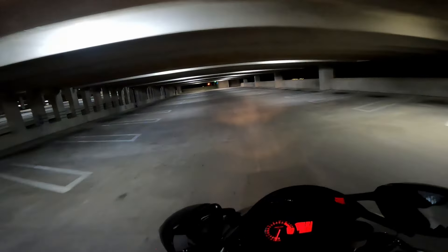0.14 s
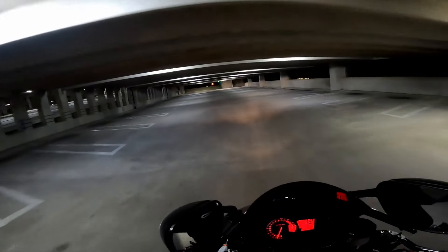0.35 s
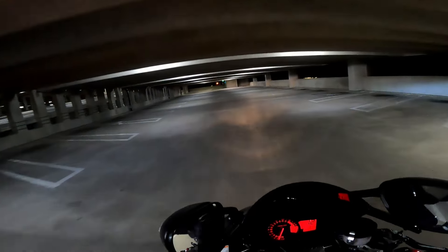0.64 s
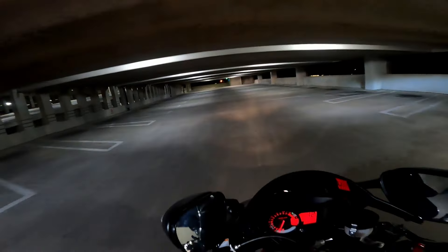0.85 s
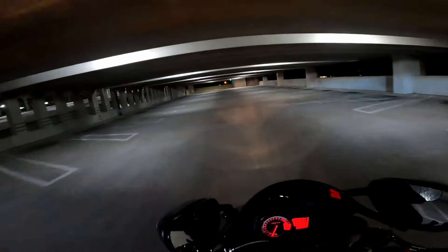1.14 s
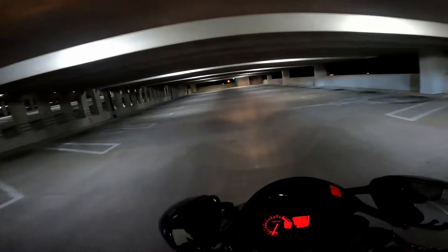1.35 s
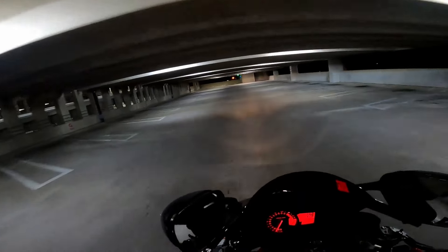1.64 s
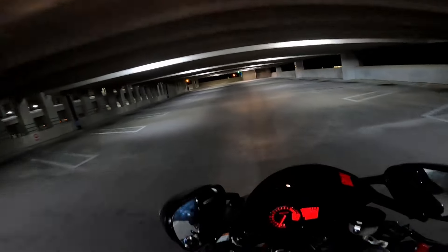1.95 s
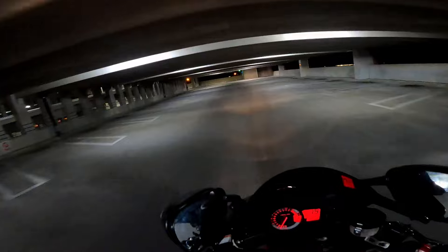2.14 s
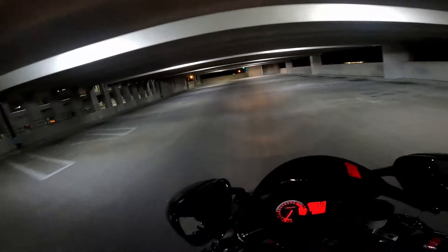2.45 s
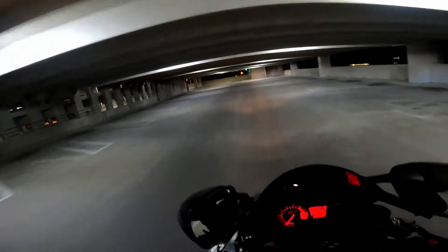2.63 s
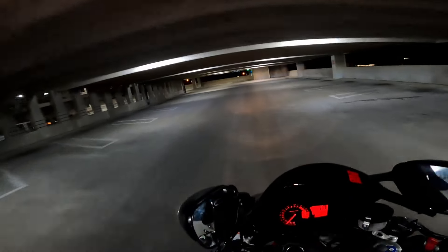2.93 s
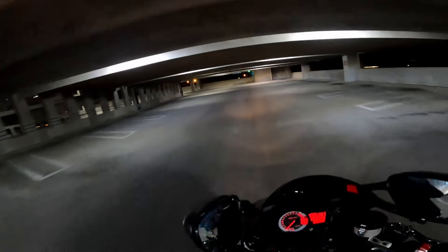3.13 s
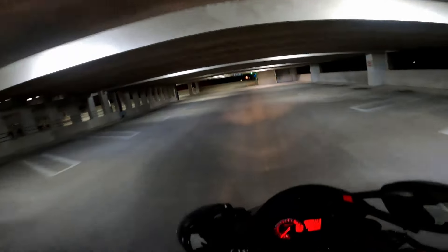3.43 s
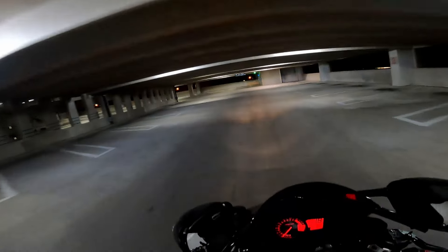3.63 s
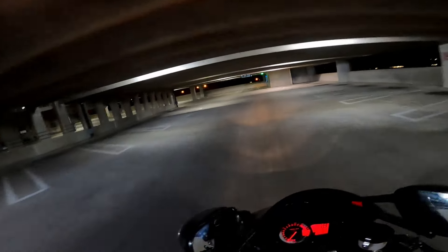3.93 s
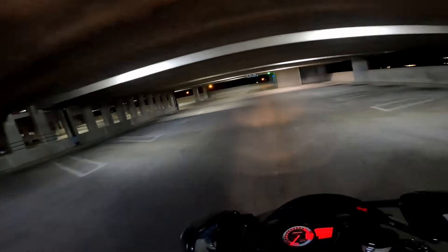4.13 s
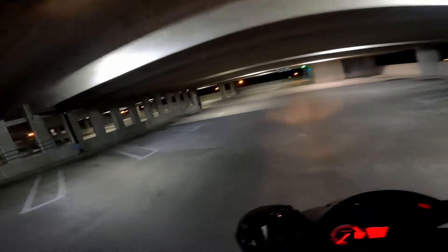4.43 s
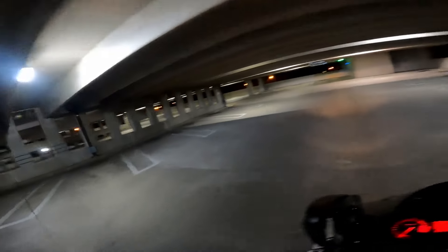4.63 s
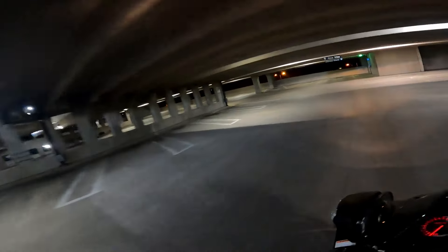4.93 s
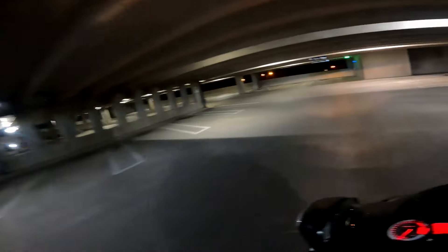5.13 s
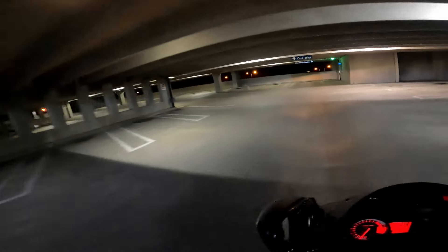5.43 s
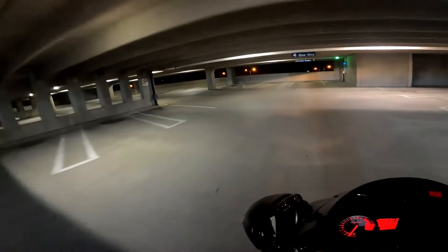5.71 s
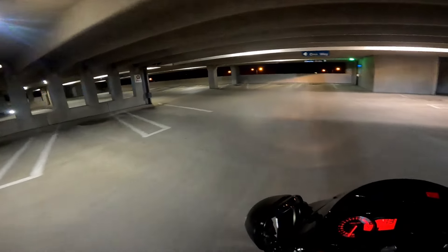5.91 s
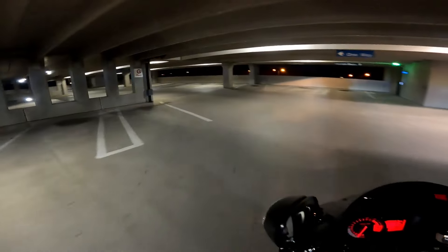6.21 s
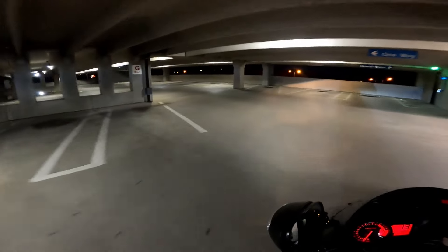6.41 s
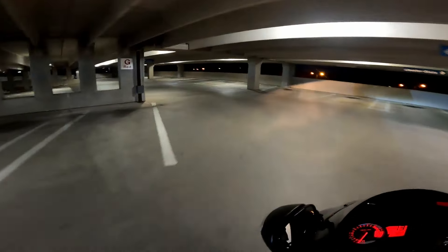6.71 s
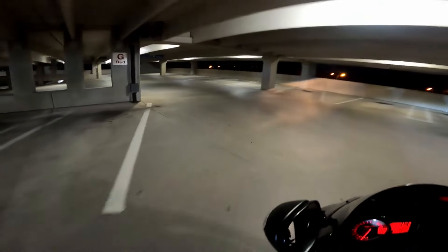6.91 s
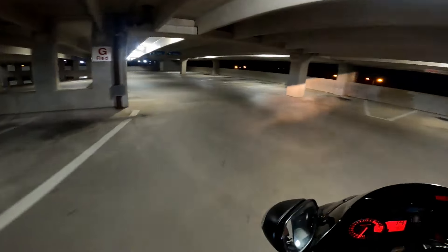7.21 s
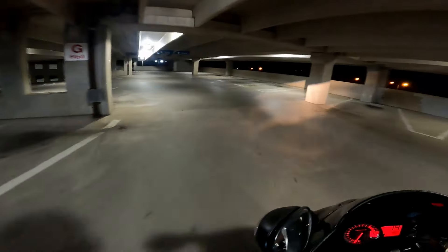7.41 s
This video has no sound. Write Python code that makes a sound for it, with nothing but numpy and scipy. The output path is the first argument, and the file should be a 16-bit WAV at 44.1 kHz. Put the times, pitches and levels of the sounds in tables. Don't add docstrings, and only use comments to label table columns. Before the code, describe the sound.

A four-cylinder motorcycle hums upward through a low concrete garage, peaks, coasts down with ticking valve gear, then rumbles unevenly as it pulls again.

```python
import sys
import numpy as np
from scipy import signal
from scipy.fft import rfft, irfft, next_fast_len
from scipy.io import wavfile
from scipy.ndimage import uniform_filter1d

SR = 44100
rng = np.random.default_rng(int(sys.argv[2]) if len(sys.argv) > 2 else 0)


def decibels_to_gain(level_db):
    exponent = np.asarray(level_db, float) / 20
    return 10 ** exponent


def put_to_file(sound):
    columns = np.atleast_2d(sound).T
    safe = np.clip(columns, -1, 1)
    whole_steps = np.round(safe * 32767)
    wavfile.write(sys.argv[1], SR, whole_steps.astype(np.int16))


N = 333396
T = np.arange(N) / SR

# time_s, throttle (0-1), uneven_burning (0-1)
THROTTLE = [(0, 0.8, 0), (1.2, 0.71, 0.18), (1.7, 0.76, 0), (2.05, 0.87, 0), (2.4, 0.93, .05),
            (2.8, 1., 0.1), (3.2, 0.91, 0.1), (3.32, 0.4, 0.51), (3.9, 0, 0.52), (4.5, 0.11, 0.64),
            (5.3, 0.35, 0.99), (5.9, 0.42, 1.), (6.2, .64, 0.8), (6.8, 0.67, 0.45), (7.15, 0.69, 0.3),
            (7.56, 0.4, 0.4)]


def evened(x):
    return x / np.sqrt(np.mean(x ** 2) + 1e-20)


def column(table, k):
    rows = np.array(table, float)
    return np.interp(T, rows[:, 0], rows[:, k])


def throttle_shut():
    return 1 - column(THROTTLE, 1)


def unevenness():
    return column(THROTTLE, 2)


def read(points, hz):
    f, value = np.transpose(points)
    return np.interp(np.log(hz + 1), np.log(f + 1), value)


def colour(x, points):
    length = x.shape[-1]
    size = next_fast_len(length)
    gain = decibels_to_gain(read(points, np.fft.rfftfreq(size, 1 / SR)))
    return irfft(rfft(x, size) * gain, size)[..., :length]


def ring(x, hz, width_hz):
    b, a = signal.iirpeak(hz, hz / width_hz, SR)
    return signal.lfilter(b, a, signal.lfilter(b, a, x))


def drift(rate_hz):
    knots = rng.standard_normal(400)
    return np.interp(T * rate_hz, np.arange(len(knots)), knots)


def swells(rows):
    return sum(db * np.cos(np.pi * np.clip((T - s) / length, -.5, .5)) ** 2 for s, db, length in rows)


def firings(turns, sizes):
    at = np.flatnonzero(np.diff(np.floor(turns)) > 0)
    train = np.zeros(N)
    train[at] = sizes[:len(at)]
    return train


def deck(x):
    # pitch_hz, t60_s
    decay = [(60, 1), (250, 0.9), (1000, 0.99), (4000, 1), (12000, 0.39)]
    # pitch_hz, echo_db
    echo_level = [(60, -28.5), (130, -27), (300, -16.5), (700, -11.5), (1500, -7), (4000, -5), (8000, -2),
                  (12000, -0.5)]
    taps = np.zeros((4, SR))
    at = np.arange(300, SR - 20, 20) + rng.integers(0, 20, (4, (SR - 301) // 20))
    np.put_along_axis(taps, at, rng.choice([-1., 1.], at.shape), 1)

    hz, t, z = signal.stft(taps, SR, nperseg=1024)
    z = z * decibels_to_gain(-60 * t / read(decay, hz)[:, None])
    band_power = uniform_filter1d((abs(z) ** 2).sum(axis=-1), size=9, axis=-1)
    z /= np.sqrt(band_power)[..., None]
    tail = signal.istft(z, SR, nperseg=1024)[1]
    tail = colour(tail / np.linalg.norm(tail[0]), echo_level)

    earlier = np.concatenate([x[SR:0:-1], x])
    echoes = signal.fftconvolve(earlier[None], tail, axes=1)[:, SR:SR + N]
    passing = 2 * np.pi * np.cumsum(1.3 + .4 * drift(3.0)) / SR
    return np.cos(passing) * echoes[:2] + np.sin(passing) * echoes[2:]


def hiss(firing_hz, turns):
    # pitch_hz, level_db (per Hz)
    noise_colour = [(530, -29.5), (950, 1), (1400, -4.5), (2000, -2.5), (2600, -9.5), (4400, -15),
                    (4950, -14), (5600, -19), (7600, -24), (8300, -29), (10800, -37.5), (12100, -36.5),
                    (13200, -43.5), (15600, -60.5)]
    frames, hz = N // 128 + 5, np.fft.rfftfreq(512, 1 / SR)
    a, b, patches = rng.standard_normal((frames, 257, 3)).T
    patches = evened(uniform_filter1d(uniform_filter1d(patches, 8, 0), 16, 1))
    flicker = evened(uniform_filter1d(rng.standard_normal(frames), 12))
    z = (a + 1j * b) * decibels_to_gain(read(noise_colour, hz)[:, None] + 0.35 * patches + .8 * flicker)
    noise = signal.istft(z, nperseg=512, noverlap=384)[1][:N]

    band = signal.butter(4, [2600, 9000], "band", fs=SR, output="sos")
    noise /= np.std(signal.sosfilt(band, noise))
    octaves = np.log2(firing_hz / firing_hz[0])
    level_db = -50.5 + 2.5 * throttle_shut() + 3 * unevenness() + 3.5 * octaves
    puffs = 1 + 0.067 * np.cos(2 * np.pi * turns)
    return decibels_to_gain(level_db) * noise * puffs


def valves(turns):
    # start_s, end_s, level_db
    drags = [
        (1.901, 2.7, 6),
        (3.0, 4.8, 11),
        (3.7, 4.8, 2.5),
        (4.947, 5.6, 14),
    ]
    rise_s, fall_s = .6, 0.11
    drag_db = sum(np.interp(T, [s, min(s + rise_s, end), end, end + fall_s], [0, db, db, 0])
                  for s, end, db in drags)

    ticks = firings(turns, 1 + .25 * rng.standard_normal(1200))
    chain = sum(decibels_to_gain(2.5 * drift(30.)) * np.cos(2 * np.pi * k * turns + 1.15 * drift(40.))
                for k in (18, 19))
    cover = .45 * evened(ring(ticks, 2040, 300))
    return decibels_to_gain(-57.5 + drag_db) * (cover + ring(chain, 2010, 560))


def rumble(turns):
    cylinders_db = [0.44, -0.84, -0.95, -0.98]
    # pitch_hz, width_hz, level_db
    silencer = [(105.7, 54, -4.5), (179.8, 51, -6), (230.9, 76.3, -0.5), (381, 101, -7)]
    airbox = [(69.8, 21, 5.5), (42, 38, -11.5)]
    tail_pipe = [(533, 153, -2.5), (651, 153, -7), (736, 278, -7)]
    # time_s, level_db, length_s
    thumps = [
        (1.73, 4, 0.33),
        (2.68, 1.5, .25),
        (5.12, 2, .3),
        (5.9, 3, 0.23),
    ]
    # time_s, level_db, length_s
    stumbles = [(0.0, 18, .2), (.28, 21.5, 0.48), (.85, 8, 0.33), (1.25, 8, .4), (2.2, 6, 0.27),
                (3.1, -2.5, 0.29), (4.2, 5.5, 0.27), (4.6, -4, .2), (5.22, -1.5, .3), (5.64, -0.5, .3),
                (5.91, 3.5, 0.1), (6.15, -6, 0.45), (7.1, 6, .25), (7.56, 16.5, 0.16)]
    even_db = [-22.5, -40.0, -28.5]
    uneven_db = [4.5, 15.5, 1]

    chance = rng.standard_normal(1200)
    pattern = decibels_to_gain(np.resize(cylinders_db, len(chance))) - 1
    turbulence = 2.32 * rng.standard_normal(N)
    drive = evened(firings(turns, chance + 5.4 * pattern)) + turbulence

    extra_db = swells(thumps), swells(stumbles), -4.5 * throttle_shut()
    total = 0
    for k, modes in enumerate((silencer, airbox, tail_pipe)):
        part = sum((-1) ** i * decibels_to_gain(db) * evened(ring(drive, hz, width_hz))
                   for i, (hz, width_hz, db) in enumerate(modes))
        total = total + decibels_to_gain(even_db[k] + uneven_db[k] * unevenness() + extra_db[k]) * part
    return total


def orders(hz, turns):
    # pitch_hz, level_db
    header = [(78, -16), (97, -19), (120, -12.5), (150, -13.5), (185, -10.5), (225, -12), (255, -20),
              (290, -29)]
    # pitch_hz, level_db
    pipe = [(310, -24.5), (365, -20.5), (420, -22.5), (445, -32.5), (490, -42), (525, -30), (590, -31.5),
            (660, -35.5), (712, -40.5), (775, -37.5), (825, -49.5), (900, -49.5), (1000, -53.5),
            (1400, -66)]
    shut_db = [-4.5, -4.5, -18.5, -24]
    # time_s, level_db, length_s
    first_fades = [(.32, 0, 0.51), (.86, 3, 0.25), (1.51, -3, 0.2), (2.27, 5, 0.16), (3.13, -10, 0.18),
                   (3.85, 4, 0.66), (4.21, -0.5, 0.18), (5.18, -4.5, .22), (5.95, 2.5, 0.31),
                   (6.48, 1.5, 0.25), (7.02, -10, 0.31), (7.56, -6.5, 0.45)]
    second_fades = [(.37, -9, 0.56), (.65, -8.5, 0.18), (.86, -14, 0.24), (1.02, 3.5, 0.13),
                    (1.19, -4, 0.27), (1.5, 2.5, .12), (2.05, -6, 0.23), (2.15, 6.5, 0.089),
                    (2.251, -5.5, 0.16), (2.36, 5, 0.085), (2.59, -5, 0.12), (3.24, -18.5, 0.34),
                    (3.65, -17.5, 0.67), (4.16, -11, 0.87), (4.64, -6, .22), (5.08, -11, 0.15),
                    (5.33, -4, 0.25), (5.62, -2.5, 0.4), (5.84, -27, 0.24), (6.31, -7.5, 0.46),
                    (6.7, 6.5, 0.3), (6.8, -17.5, .2), (7.34, -6.5, 0.16), (7.56, -8, 0.17)]
    third_fades = [(0.0, -18.5, 0.42), (1.349, -6.5, 0.33), (2.05, 10, 0.3), (2.6, 4, 1.2),
                   (3.13, 11, 0.11), (4.43, 22, 0.31), (6.53, 7.5, 0.26), (6.91, 6, .22), (7.3, -12, .9)]

    shut = throttle_shut()
    waver = 1 + 1.5 * unevenness()
    low = 0
    for k, fades in enumerate((first_fades, second_fades, third_fades), 1):
        level_db = read(header, k * hz) + shut_db[k - 1] * shut + swells(fades) + .6 * k * waver * drift(24.0)
        low = low + decibels_to_gain(level_db) * np.cos(2 * np.pi * k * turns + 0.16 * k * waver * drift(16.0))

    high = 0
    for k in range(4, 13):
        level_db = read(pipe, k * hz) + 3.4 * drift(17.0)
        high = high + decibels_to_gain(level_db) * np.cos(2 * np.pi * k * turns + .62 * drift(11.0))
    high_db = 3.5 + shut_db[-1] * shut
    return -np.sqrt(2) * (low + decibels_to_gain(high_db) * high)


def ports(x):
    # pitch_hz, lead_radians
    port_lead = [(70, 0), (125, -.1), (250, -.3), (520, -.42), (1200, -.6), (2330, -.7), (6290, -.1),
                 (12000, .2)]
    wide = np.pad(x, SR, "reflect")
    size = next_fast_len(len(wide))
    turn = np.exp(.5j * read(port_lead, np.fft.rfftfreq(size, 1 / SR)))
    return irfft(rfft(wide, size) * np.array([turn, 1 / turn]), size)[:, SR:SR + N]


def scene():
    # time_s, firing_hz
    speed = [(0, 77.47), (1.08, 87.73), (2.05, 97.12), (2.5, 109), (3.04, 131), (3.2, 127.4), (3.45, 127.6),
             (3.65, 121), (4.0, 114.5), (4.4, 110.5), (4.58, 105.5), (4.8, 103), (5.45, 91.6),
             (5.83, 86.47), (6.12, 90.3), (6.6, 89.9), (7.05, 93.73), (7.56, 93.06)]
    # time_s, left_minus_right_db
    head = [
        (0.0, .7),
        (0.65, 1.0),
        (4.5, 1.6),
        (7.56, 1.7),
    ]
    hz = uniform_filter1d(column(speed, 1), size=8000, mode="nearest")
    jitter = 1 + 0.004034 * drift(25.0) + .003 * drift(7.0)
    turns = 0.2934 + np.cumsum(hz * jitter) / SR
    bike = hiss(hz, turns) + valves(turns) + rumble(turns) + orders(hz, turns)
    lean_db = column(head, 1)
    return (ports(bike) + deck(bike)) * decibels_to_gain([lean_db / 2, -lean_db / 2])


def top_cut(x):
    return signal.sosfilt(signal.butter(12, 15710, fs=SR, output="sos"), x)


def record(dry):
    x = signal.sosfilt(signal.butter(2, 44, "high", fs=SR, output="sos"), dry)
    power_db = 10 * np.log10(uniform_filter1d((x ** 2).mean(0), 1800) + 1e-9)
    x = x / decibels_to_gain(0.43 * np.maximum(power_db + 12.5, 0))
    mix = 0.99 * np.tanh(x * decibels_to_gain(0.95) / 1.022)
    return top_cut(mix)


dry = scene()
out = record(dry)
put_to_file(out)
```